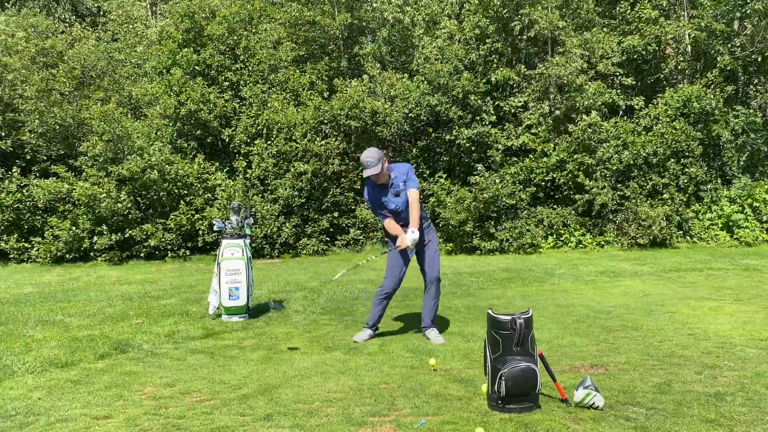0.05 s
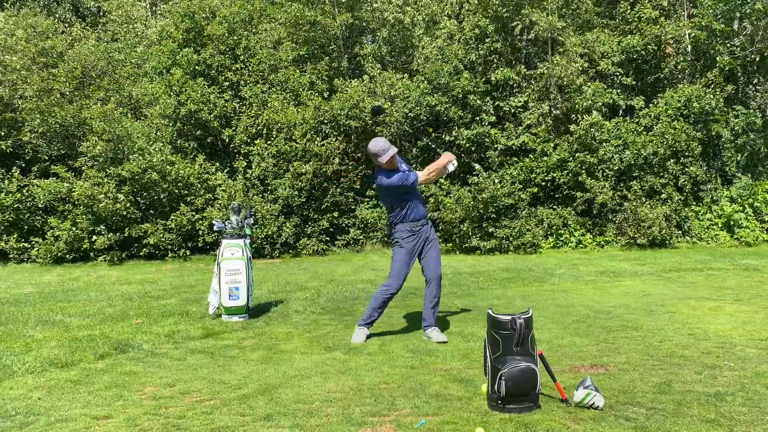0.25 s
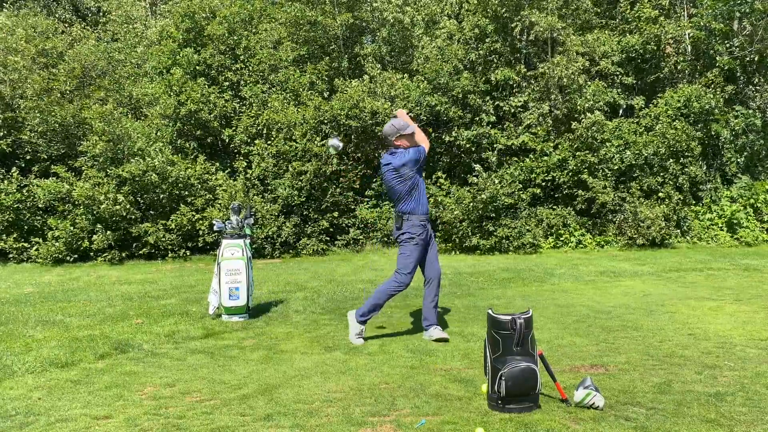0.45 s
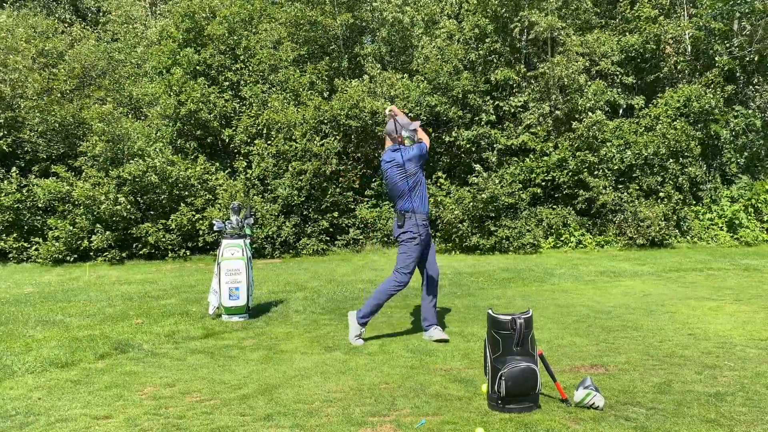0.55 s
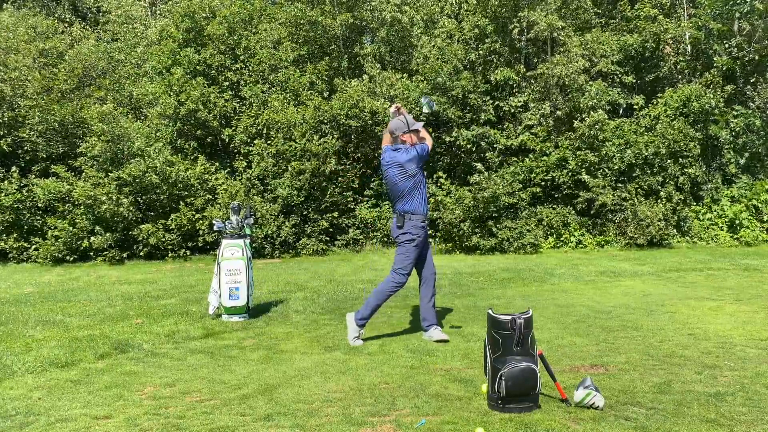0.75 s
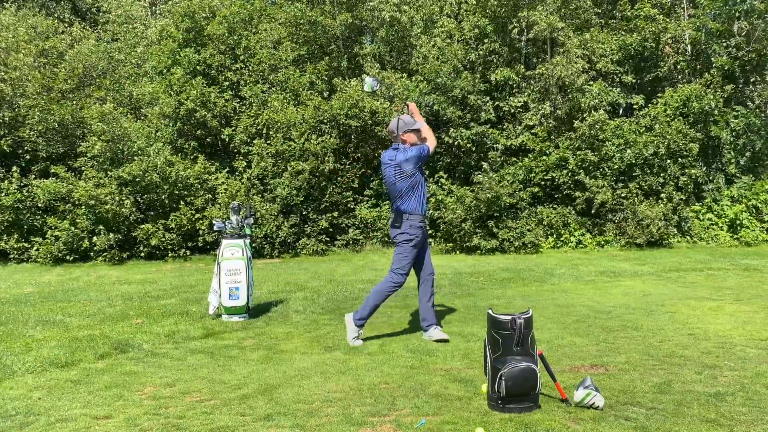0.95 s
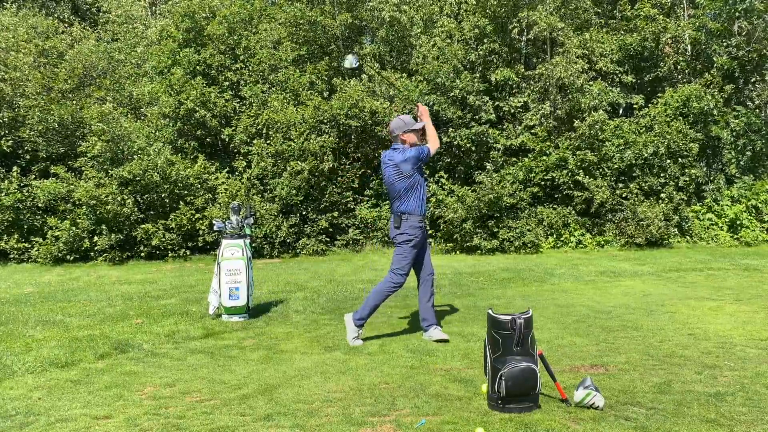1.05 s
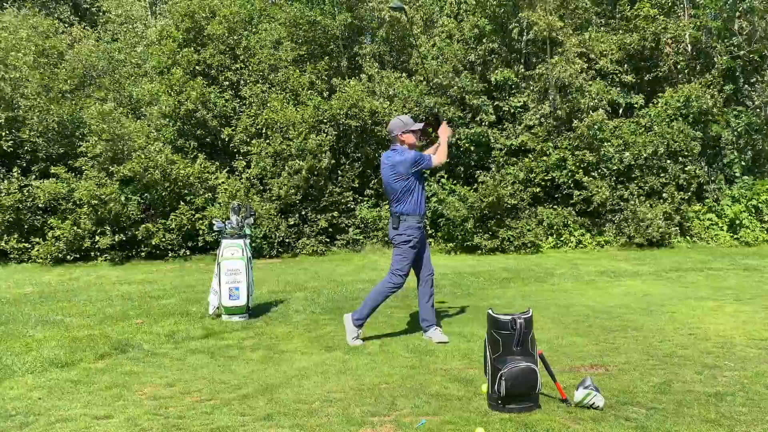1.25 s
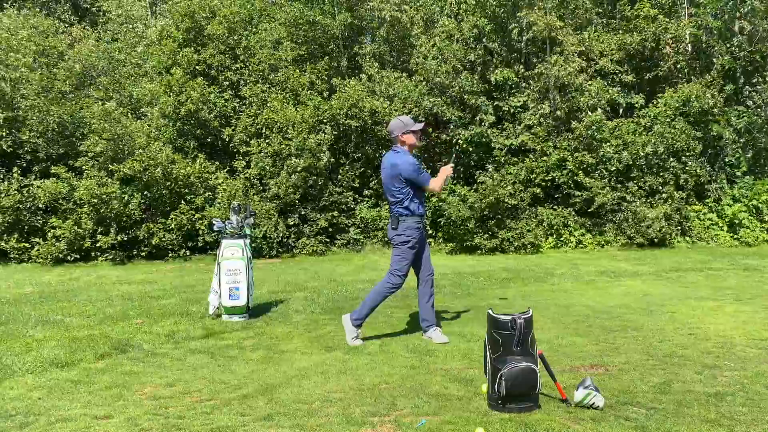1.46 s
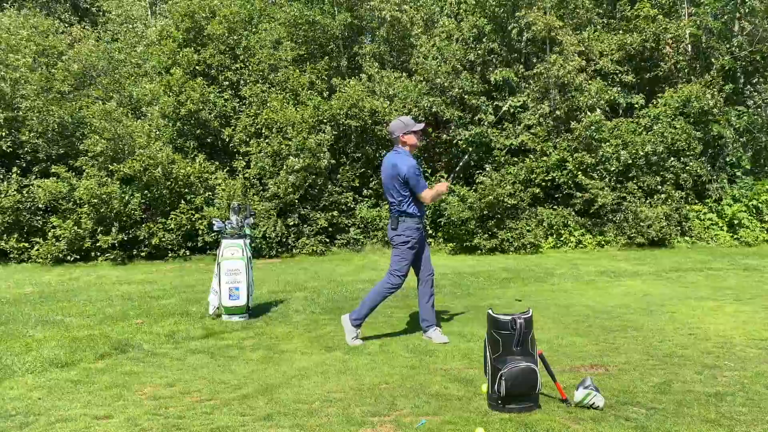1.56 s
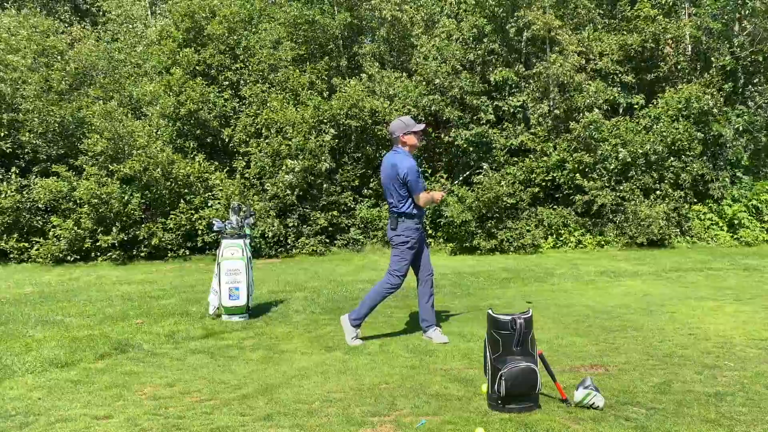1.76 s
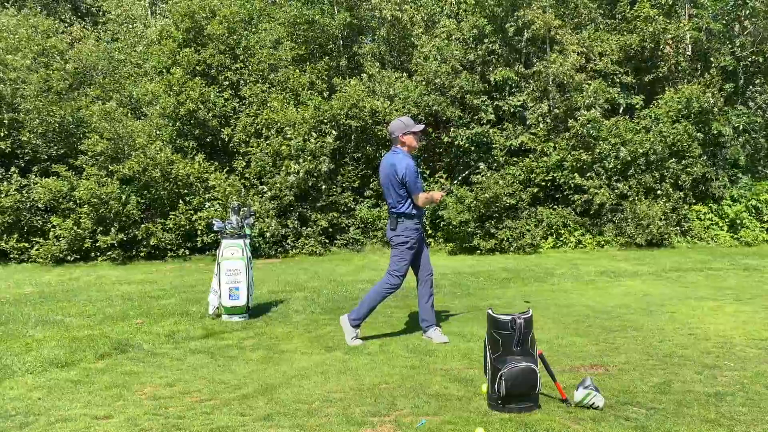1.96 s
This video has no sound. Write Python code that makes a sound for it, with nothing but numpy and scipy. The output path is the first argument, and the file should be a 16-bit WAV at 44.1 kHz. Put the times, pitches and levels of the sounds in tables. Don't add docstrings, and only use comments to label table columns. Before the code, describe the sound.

Outdoors on a grassy range, a fast swing rumbles and whistles, then the club smacks the ball with a bright, short ring; cloth rustles fade into near silence, ending with tiny clicks and faint chirps.

```python
import sys
import numpy as np
from scipy import signal
from scipy.fft import rfft, irfft
from scipy.io import wavfile
from scipy.ndimage import uniform_filter1d

SR = 44100
rng = np.random.default_rng(int(sys.argv[2]) if len(sys.argv) > 2 else 0)


def store_wav(level_fs):
    pcm = np.round(np.clip(np.atleast_2d(level_fs), -1, 1) * 32767)
    wavfile.write(sys.argv[1], SR, pcm.T.astype(np.int16))


def volts_from_decibels(level):
    exponent = np.asarray(level, float) / 20
    return 10 ** exponent


N = 88200

# t/s, f/Hz, peak level/dB, T60/s
BALL_KNOCK = [
    (.1202, 1130, -5.5, .019),
    (.1200, 8100, -15, .004),
    (.1206, 1850, -10, .008),
    (.1212, 500, -17, .025),
]
# f/Hz, level/dB, T60/s
HEAD_MODES = [(3380, -7.5, 0.076), (3532, -7.5, .08), (4093.5, -2, .058), (4285, -3.5, .066),
              (4437, -9, .05), (4705, -19.5, .1), (5370.3, -3.5, .046), (5697, -8.5, .051),
              (6805, -15.5, .061), (8035.7, -0.5, .028), (8855, -8, .043), (9710, -13, .049)]
# f/Hz, peak level/dB, T60/s
CROWN_PAIR = [
    (2160, -39, .3),
    (2153, -45, .6),
]
# f/Hz, density level/dB per Hz
CRACK_SPECTRUM = [(1200, -21.5), (2000, -12), (3000, -1.5), (5200, -5.5), (8500, -3), (12300, -16.5),
                  (14500, -8.5), (16000, -15.5)]
# f/Hz, density level/dB per Hz
SIZZLE_SPECTRUM = [(3000, -47.5), (4600, -16), (5300, -2), (6300, -9), (8100, -1), (10500, -5),
                   (12400, -25), (16000, -29)]
# t/s, f/Hz, level/dB
SWISH_PATH = [
    (.06, 603.8, -52.5),
    (.083, 801.6, -40.5),
    (.096, 943.8, -31.5),
    (.108, 1054, -32),
    (.12, 1022, -36),
    (.136, 727.4, -34),
    (.16, 653.6, -46),
    (.185, 522.4, -48.5),
    (.24, 390.7, -78),
]
# f/Hz, density level/dB per Hz
HEDGE_SPECTRUM = [(900, -21), (1500, -7), (4000, 0.5), (6500, -5.5), (9500, 2), (12000, -7.5), (16000, -24)]
# f/Hz, density level/dB per Hz
WASH_SPECTRUM = [(500, -30), (900, -8.5), (2100, -10), (4800, -8), (5200, 4), (5650, -8), (11000, -16),
                 (16000, -30)]
# t/s, level/dB
BUFFET_LEVEL = [(0, -44), (.045, -35.5), (.075, -23.5), (.12, -30.5), (.17, -36.5), (.225, -36.5),
                (.3, -46), (.36, -42), (.4, -43), (.47, -47.5), (.55, -55.5), (.6, -53), (.65, -60),
                (.71, -58), (1.1, -62), (1.45, -59.5), (1.68, -59.5), (2, -62.5)]
# f/Hz, density level/dB per Hz
BUFFET_SPECTRUM = [(12, -34.5), (20, 6.5), (82, -6.5), (119, -11), (362, -30.5), (400, -29.5), (520, -58),
                   (880, -120)]
# t/s, level/dB
RUSTLE_LEVEL = [(0, -59.5), (.07, -61), (.11, -52), (.2, -58.5), (.33, -59.5), (.45, -65.5), (.6, -72.5),
                (1.0, -78.5), (1.3, -84.5), (1.5, -74), (1.75, -76.5), (2, -77)]
# f/Hz, density level/dB per Hz
RUSTLE_SPECTRUM = [(180, -31), (300, -6.5), (565, -2.5), (656, -6), (787, -3.5), (9710, -16), (16000, -31)]
# t/s, level/dB, centre f/Hz, length/s
PUFF_EVENTS = [
    (.0071, -59, 814.3, 0.007713),
    (0.0297, -48, 689.4, 0.011413),
    (0.0449, -41, 879.6, 0.01078),
    (0.0537, -43.5, 989, 0.007363),
    (.3265, -50, 170, .014),
    (0.677, -65.5, 701.1, 0.018017),
    (0.782, -66, 610.9, 0.016275),
]
# t/s, peak level/dB, f/Hz, T60/s
GRIP_CLICKS = [(1.8855, -62.5, 8578, 0.006325), (1.9285, -53, 9100, 0.001677),
               (1.9305, -51.5, 10050, 0.001594), (1.932, -52.5, 5000, .005), (1.936, -55, 2938, .005),
               (1.9412, -44, 1708, 0.0052), (1.9412, -56.5, 5911, 0.003985), (1.968, -63.5, 2117, 0.00823),
               (1.976, -47, 2085, 0.01876), (1.9758, -58, 4286, 0.0148), (1.9749, -58, 8942, 0.00266),
               (1.983, -53.5, 660, 0.01678), (1.987, -77, 4426, .015), (1.994, -59.5, 4555, 0.045),
               (1.9985, -48, 1410, 0.00579)]
# t/s, length/s, start f/Hz, end f/Hz, level/dB
BIRD_CHIRPS = [
    (0.634, 0.03907, 2929, 2767, -72),
    (1.804, .015, 2569, 2597, -76),
    (1.822, .024, 3420, 4095, -73),
    (1.862, 0.013, 2804, 2808, -75.5),
    (1.884, 0.03996, 2633, 2626, -74.5),
]
# f/Hz, density level/dB per Hz
AIR_SPECTRUM = [(88, -29), (150, -3), (270, -18), (730, -12), (941, -16.5), (7770, -30), (14500, -37.5),
                (16000, -51.5)]

RING_S, RING_DB = .1224, -14.5
RATTLE_S = 0.0017
GUST_PEAK, GUST_S = 0.07676, 0.007081
SCUFF_S, SCUFF_DB = 1.976, -59.5
OVERLOAD_TOP, CUTOFF_HZ = .45, 16300


def rms_one(x):
    return x / np.sqrt(np.mean(x ** 2) + 1e-20)


def in_time(rows):
    times, *columns = np.transpose(rows)
    t = np.arange(N) / SR
    return [np.interp(t, times, column) for column in columns]


def drift(rate):
    pole = np.exp(-80 * np.pi * rate / SR)
    chance = rng.standard_normal(N // 40 + 2002)
    slow = signal.lfilter([1], [1, -2 * pole, pole * pole], chance)[2000:]
    return np.interp(np.arange(N) / 40, np.arange(len(slow)), rms_one(slow))


def ring(drive, hz, t60):
    radius = volts_from_decibels(-60 / (t60 * SR))
    turn = 2 * np.pi * hz / SR
    return signal.lfilter([0, np.sin(turn)], [1, -2 * radius * np.cos(turn), radius * radius], drive + 1e-18)


def noise(spectrum, patchy_db):
    f = np.maximum(np.fft.rfftfreq(N, 1 / SR), 1)
    hz, db = np.transpose(spectrum)
    shaped = rfft(rng.standard_normal(N)) * volts_from_decibels(np.interp(np.log(f), np.log(hz), db))
    octave = np.clip(np.log2(f / 40).astype(int), 0, 8)
    out = np.zeros(N)
    for k in range(9):
        flicker = volts_from_decibels(patchy_db * drift(7.4222))
        out += irfft(shaped * (octave == k), N) * flicker
    return rms_one(out)


def dying(start, rise, hold, t60):
    t = np.arange(N) / SR - start
    release = volts_from_decibels(-60 * np.maximum(t - rise - hold, 0) / t60)
    return np.clip(t / rise, 0, 1) * release


def taps(rows, rough):
    out = np.zeros(N)
    scratches = rng.standard_normal((len(rows), 400))
    for (s, db, hz, t60), grit in zip(rows, scratches):
        scratch_length = t60 * SR / 10
        fade = np.exp(-np.arange(400) / scratch_length) / np.sqrt(scratch_length)
        drive = np.zeros(SR // 2)
        drive[:400] = rough * grit * fade
        drive[0] = 1
        i = int(s * SR)
        out[i:i + SR // 2] += volts_from_decibels(db) * ring(drive, hz, t60)[:N - i]
    return out


def strike():
    knock = taps([(s, db, hz, t60) for s, hz, db, t60 in BALL_KNOCK], rough=.15)
    lags = rng.random(len(HEAD_MODES))
    modes = [(RING_S + RATTLE_S * lag, RING_DB + db, hz, t60) for (hz, db, t60), lag in zip(HEAD_MODES, lags)]
    head = taps(modes, rough=0)
    crack = volts_from_decibels(-6) * dying(RING_S, 1 / SR, 0.0018, 0.018) * noise(CRACK_SPECTRUM, patchy_db=0.5)
    sizzle = volts_from_decibels(-9) * dying(RING_S, 0.00033, 0, 0.047) * noise(SIZZLE_SPECTRUM, patchy_db=0)
    ping = taps([(RING_S, db, hz, t60) for hz, db, t60 in CROWN_PAIR], rough=0)
    return knock + head + ping + crack + sizzle


def swish():
    hz, db = in_time(SWISH_PATH)
    phase = 2 * np.pi * np.cumsum(hz) / SR
    half_width = signal.butter(2, 100, fs=SR, output="sos")
    a, b, c, d = signal.sosfilt(half_width, rng.standard_normal((4, N)))
    shaft = a * np.cos(phase) + b * np.sin(phase)
    head = c * np.cos(phase / 2) + d * np.sin(phase / 2)
    return volts_from_decibels(db) * rms_one(shaft + volts_from_decibels(-3) * head)


def trees():
    hedge = volts_from_decibels(-55) * dying(.175, 0.01, 0.02819, 0.112) * noise(HEDGE_SPECTRUM, patchy_db=-0.5)
    wash = volts_from_decibels(-49) * dying(0.14908, 0.01, 0, 0.449) * noise(WASH_SPECTRUM, patchy_db=1.5)
    return hedge + wash


def buffet():
    x = noise(BUFFET_SPECTRUM, patchy_db=1.5)
    power = uniform_filter1d(uniform_filter1d(x ** 2, size=1800), size=1800)
    x = rms_one(x / (power + .02) ** (0.35 / 2))
    progress = np.minimum(np.arange(N) / SR / GUST_S, 1)
    gust = GUST_PEAK * np.cos(np.pi / 2 * progress) ** 2
    return volts_from_decibels(in_time(BUFFET_LEVEL)[0]) * x * progress + gust


def rustle():
    return volts_from_decibels(in_time(RUSTLE_LEVEL)[0]) * noise(RUSTLE_SPECTRUM, patchy_db=.7)


def puffs():
    out = np.zeros(N)
    draws = rng.standard_normal((len(PUFF_EVENTS), 3000))
    for (s, db, hz, length), puff in zip(PUFF_EVENTS, draws):
        n, i = int(length * SR), int(s * SR)
        two_octaves = signal.butter(3, [hz / 2, hz * 2], "band", fs=SR, output="sos")
        band = signal.sosfilt(two_octaves, puff)[-n:]
        out[i:i + n] += volts_from_decibels(db) * np.hanning(n) * rms_one(band)
    return out


def ticks():
    snaps = np.zeros(N)
    for s, db, hz, t60 in GRIP_CLICKS:
        snaps += volts_from_decibels(db - 10) * dying(s, 1 / SR, 0, 0.0035)
    return taps(GRIP_CLICKS, rough=0.6) + snaps * noise(RUSTLE_SPECTRUM, patchy_db=0.5)


def scuff():
    grit = rng.standard_normal(N) * volts_from_decibels(4.5 * drift(166.3))
    slide = ring(grit, 5000, 0.0003487)
    slide += 0.474 * ring(grit, 1959.4, 0.00816)
    slide += 0.123 * ring(grit, 4600, 0.00685)
    return volts_from_decibels(SCUFF_DB) * dying(SCUFF_S, .001, 1, 1) * rms_one(slide)


def bird():
    out = np.zeros(N)
    for s, length, from_hz, to_hz, db in BIRD_CHIRPS:
        n, i = int(length * SR), int(s * SR)
        phase = 2 * np.pi * np.cumsum(np.linspace(from_hz, to_hz, n)) / SR
        out[i:i + n] += volts_from_decibels(db) * np.sqrt(np.hanning(n)) * np.sin(phase)
    return out


def open_air():
    return volts_from_decibels(-71) * noise(AIR_SPECTRUM, patchy_db=.4)


def scene():
    background = rustle() + open_air()
    small = puffs() + ticks() + bird() + scuff()
    swing = buffet() + swish()
    impact = strike() + trees()
    return (impact + swing + small + background)[None]


def top_cut(x):
    return signal.sosfilt(signal.butter(12, 16460, fs=SR, output="sos"), x)


def record(dry):
    rounded = dry / (1 + (dry / OVERLOAD_TOP) ** 4) ** .25
    low_pass = signal.cheby2(12, 60, CUTOFF_HZ, fs=SR, output="sos")
    mix = signal.sosfilt(low_pass, rounded)
    return top_cut(mix)


dry = scene()
out = record(dry)
store_wav(out)
```